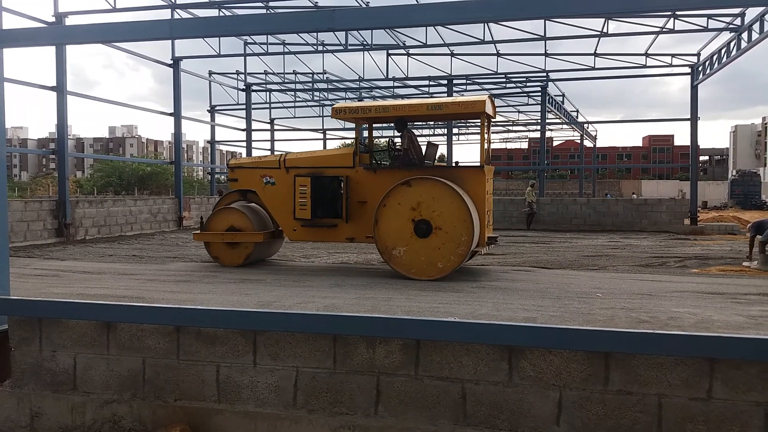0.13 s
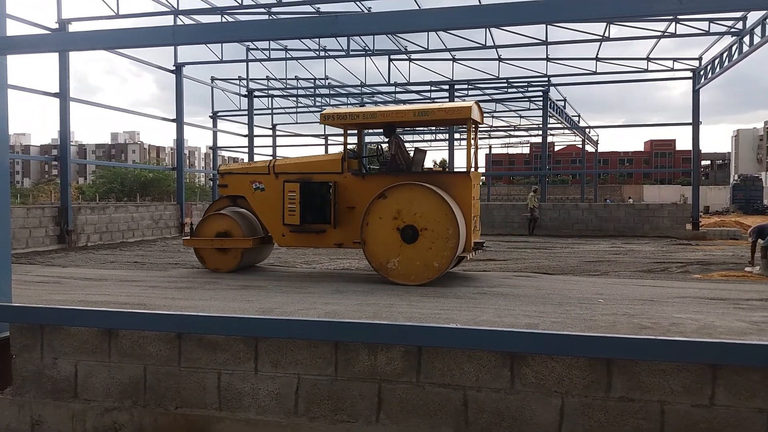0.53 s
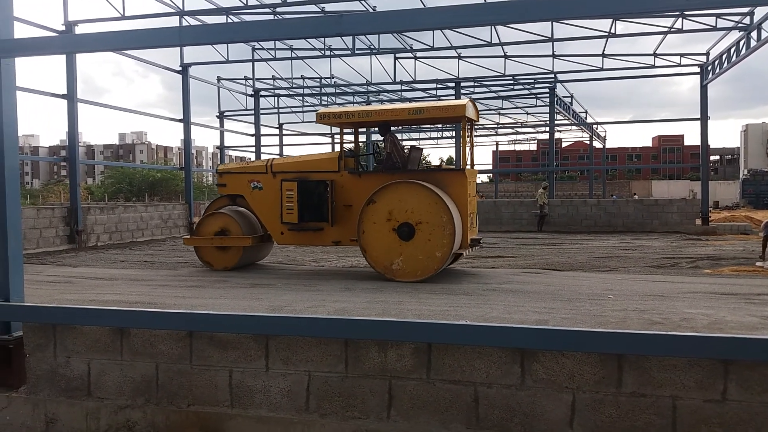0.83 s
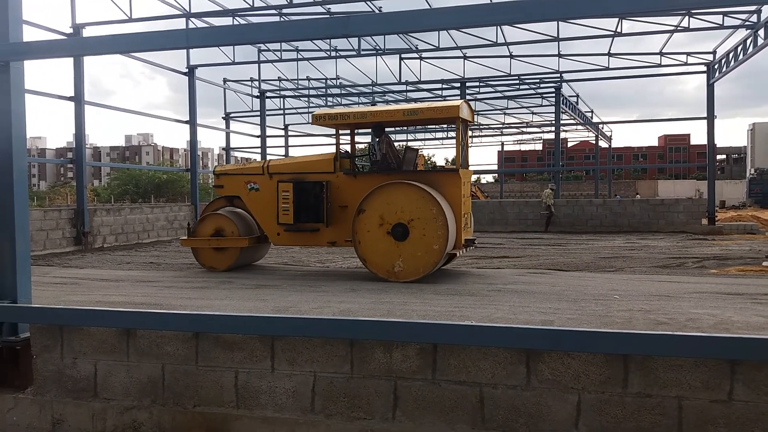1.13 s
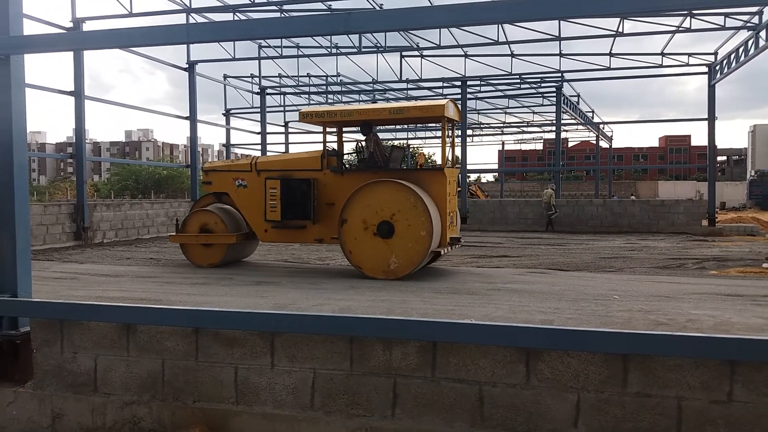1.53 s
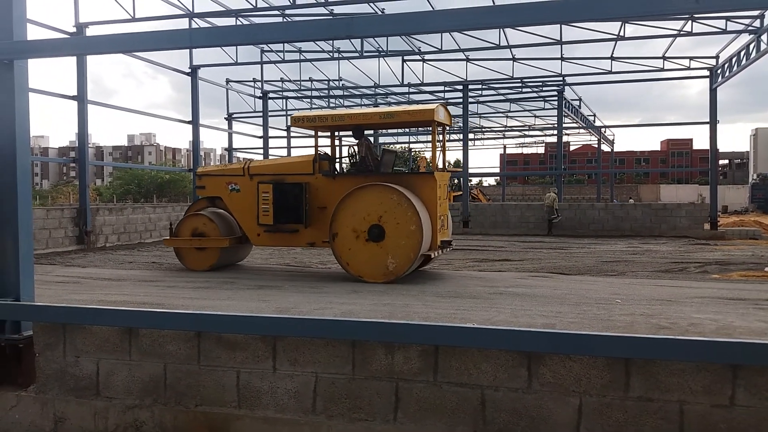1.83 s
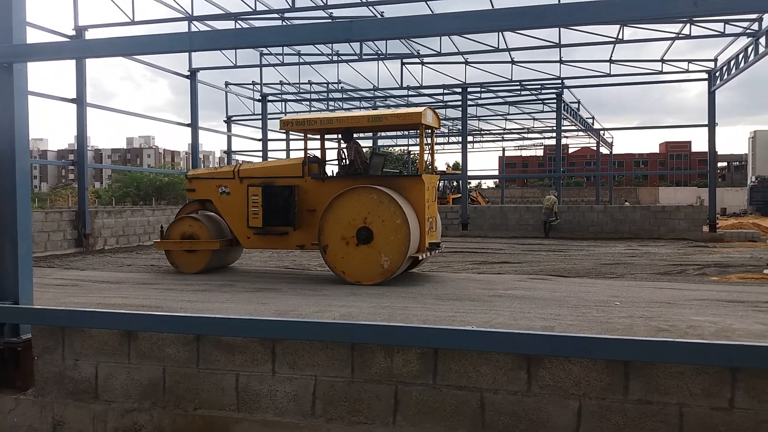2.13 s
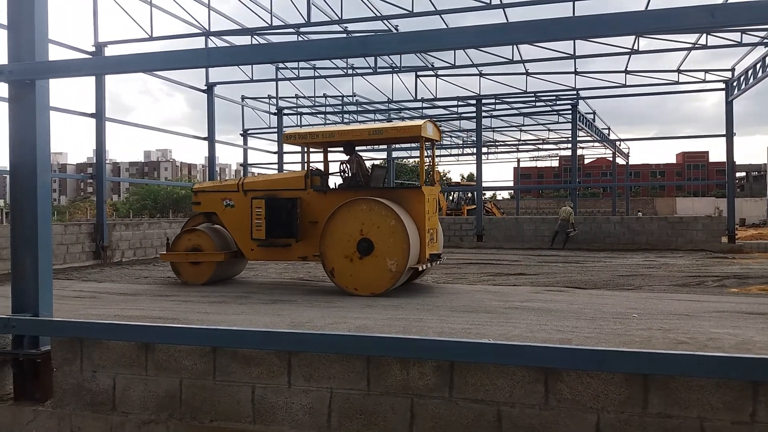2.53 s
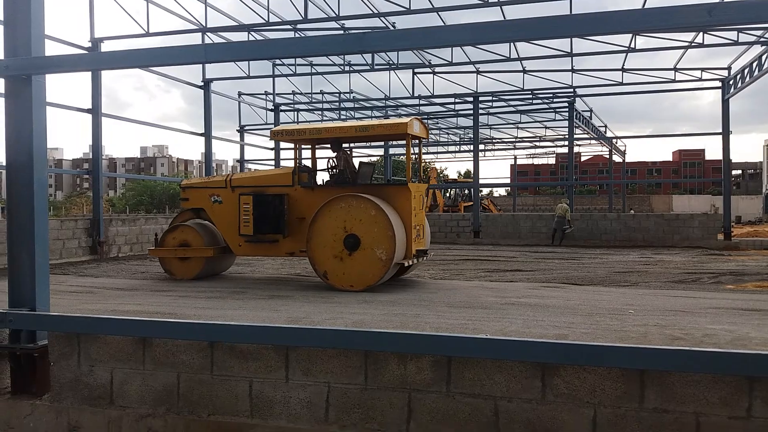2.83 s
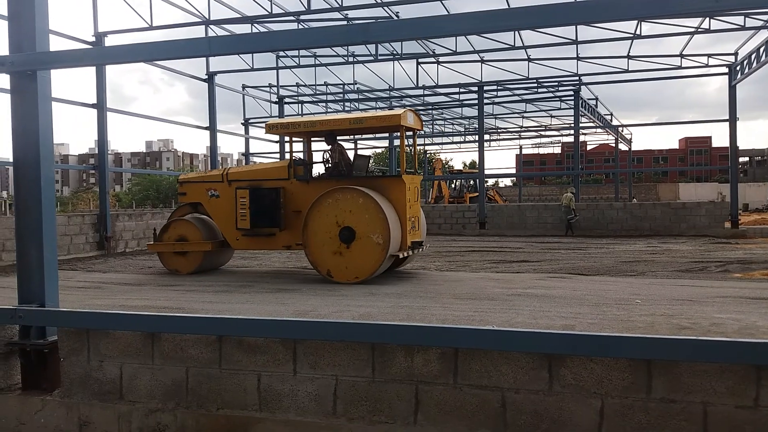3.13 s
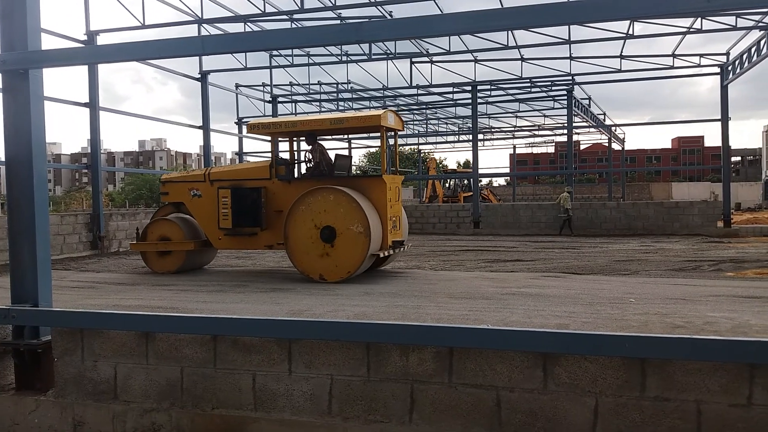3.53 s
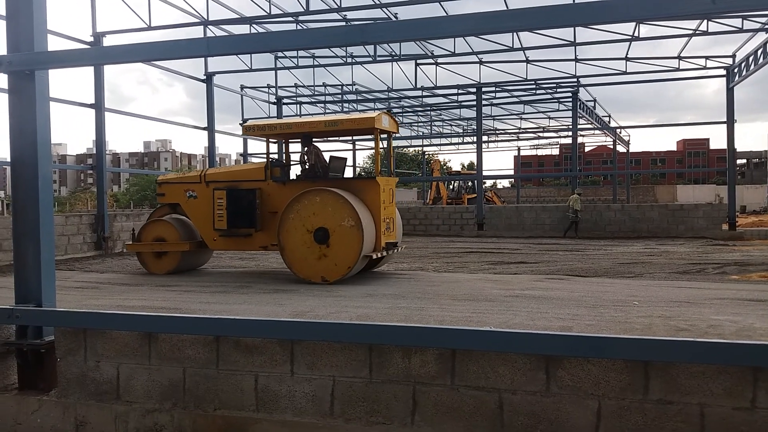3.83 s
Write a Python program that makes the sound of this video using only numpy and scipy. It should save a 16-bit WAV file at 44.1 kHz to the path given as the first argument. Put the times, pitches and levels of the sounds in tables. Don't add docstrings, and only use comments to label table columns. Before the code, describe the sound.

A diesel road roller chugs with fast hissing puffs and metallic knocking, drums rumbling on gravel.

```python
import sys
import numpy as np
from scipy import signal
from scipy.io import wavfile
from scipy.ndimage import uniform_filter1d

SR = 44100
rng = np.random.default_rng(int(sys.argv[2]) if len(sys.argv) > 2 else 0)


def to_wav(sig):
    pcm = np.clip(np.atleast_2d(sig), -1, 1) * 32767
    pcm = np.round(pcm).astype(np.int16)
    wavfile.write(sys.argv[1], SR, pcm.T)


def decibels_to_gain(level_db):
    exponent = np.asarray(level_db, float) / 20
    return 10 ** exponent


N = 175518
TIME = np.arange(N) / SR

# time_s, firings_per_s
ENGINE_SPEED = [(0, 34.229), (.7, 34.397), (1.5, 34.301), (1.9, 33.944), (2.15, 34.163), (2.5, 33.996),
                (3, 34.378), (3.98, 34.563)]
# time_s, presence_db, puff_db,
# facing # (0 side-on, 1 ahead)
ENGINE_VIEW = [(0, 3, 3.5, 0), (.09, 0.5, 3.5, 0.1), (.2, -3, -0.5, 0), (.6, -6.5, -4, .05),
               (1.1, -9, -7, 0.23), (1.35, -10, -7, 0.22), (1.62, -13, -6, 0.6), (1.75, -12.5, -12, 0.34),
               (2.2, -14.5, -12, 0.64), (2.55, -13, -17.5, 0.83), (2.75, -12.5, -12.5, 0.8),
               (3.4, -12.5, -12, 0.9), (3.98, -13, -15, 0.74)]
# freq_hz, level_db (per Hz)
GRAVEL_RUMBLE = [(25, -48), (42, -37), (55, -7.5), (76, -2.5), (110, 1), (170, -6.5), (300, -13),
                 (620, -33.5)]
# pitch_hz, width_hz, level_db
DRUM_SHELL = [
    (264.6, 31.7, -42.5),
    (301.2, 35.5, -39.5),
    (392.6, 16.3, -44.5),
]
# start_s, level_db, pitch_hz, decay_cycles
CRUSHED_STONES = [(0.172, -30, 158.3, 20), (0.264, -21.5, 101, 1), (0.602, -28.5, 165, 6),
                  (.76, -25, 150, 2), (.68, -33.5, 273, 12.5), (.77, -33, 304, 12.4),
                  (.95, -32.5, 103, 4.5), (1.001, -21, 130, 1.8), (1.35, -36.5, 302, 14.5),
                  (1.311, -29.5, 160, 4.7), (1.582, -26.5, 70.4, 1.8), (2.465, -26, 158, 2.1),
                  (2.524, -21, 109, 1.03), (2.7, -32, 164, 7.7), (3.071, -22, 81, 2.3),
                  (3.25, -30.5, 269, 3.5), (3.559, -52, 917, 35.5), (3.625, -21.5, 165, 1.8),
                  (3.81, -45, 896, 23)]
# time_s, second_order_db, fourth_order_db
EXHAUST_BOOM = [(0, -39.5, -59), (.35, -49, -61), (.62, -41, -37), (.87, -40, -47), (1.1, -35.5, -37.5),
                (1.4, -42.5, -44), (1.7, -40, -49.5), (2.1, -45.5, -52), (2.35, -40.5, -42.5),
                (2.7, -39.5, -49.5), (3.1, -38.5, -36.5), (3.3, -39, -37.5), (3.6, -60, -42),
                (3.98, -29.5, -38)]
# multiple_of_firing_rate, level_db
SHAFT_ORDERS = [(1.5, -54), (2.75, -47), (3, -54), (6, -56)]
# freq_hz, level_db (per Hz)
GEAR_CLATTER = [(470, -7.5), (575, -17), (700, -2.5), (900, -2), (1170, -10), (1500, -6), (2500, -17.5),
                (2750, -29)]
# pitch_hz, width_hz, level_db
BLOCK_MODES = [(1392, 32, 2), (1601, 66, -2), (1782, 57, -2.5), (2170, 340, -11)]
CYLINDER_SIDE_DB = [-3, -3.5, 5.5, 3]
CYLINDER_AHEAD_DB = [-8, 5, -1, -5]
# place_turns, level_db, decay_s, timing_spread_turns
FIRING_PUFFS = [
    (0, 0, .0022, .014),
    (.275, -3.5, .003, .03),
    (.08, -11.5, .0115, .02),
]
# freq_hz, level_db (per Hz)
SIDE_HISS = [(1900, -25), (2500, -4.5), (4300, -3), (5200, -6.5), (7000, -3), (9000, 0.5), (12500, -1.5),
             (16800, -4.5)]
# freq_hz, level_db (per Hz)
AHEAD_HISS = [(1900, -27), (2500, -12), (4300, -1), (5200, -7.5), (7000, -4), (9300, -3), (12500, -1.5),
              (16800, 5)]
# pitch_hz, width_hz, side_db, ahead_db
HISS_WHISTLES = [(2336, 310, -10, -20.5), (4710, 120, -24, -16), (7080, 190, -20.5, -38),
                 (8040, 890, -9.5, -6), (8444, 710, -13.5, -2.5), (11050, 600, -7.5, -9.5),
                 (14960, 900, -12, -7.5)]
# freq_hz, level_db (per Hz)
LEAK_HISS = [(2000, -19), (2800, -2.5), (4500, -3), (5300, -7), (8500, -5.5), (12500, -10), (16000, -10.5)]

FIRST_TURN, CYLINDERS = -.147, 4
BAND_EDGE_HZ = 15850


def evened(x):
    return x / np.sqrt(np.mean(x ** 2) + 1e-20)


def curve(rows, column):
    return np.interp(TIME, [r[0] for r in rows], [r[column] for r in rows])


def presence_db():
    return curve(ENGINE_VIEW, 1)


def facing_ahead():
    return np.clip(curve(ENGINE_VIEW, 3), 0, 1)


def resonate(x, hz, width_hz):
    turn = np.exp(2j * np.pi * hz * TIME)
    r = np.exp(-np.pi * width_hz / SR)
    return 2 * (turn * signal.lfilter([1 - r], [1, -r], x / turn)).real


def ring(x, hz, width_hz, wider):
    return evened(resonate(resonate(x, hz, wider * width_hz), hz, width_hz))


def noise(colour, patch_db, size, wide, slope_db=40):
    frames = 4 * N // size + 5
    hz = np.fft.rfftfreq(size, 1 / SR) + 1
    a, b, patches = rng.standard_normal((frames, len(hz), 3)).T
    patches = uniform_filter1d(patches, wide, 0)
    patches = evened(uniform_filter1d(patches, size=5, axis=1))
    f, level_db = np.transpose(colour)
    octaves_outside = np.maximum(np.log2(f[0] / hz), 0) + np.maximum(np.log2(hz / f[-1]), 0)
    shape_db = np.interp(np.log(hz), np.log(f), level_db) - slope_db * octaves_outside
    spectra = (a + 1j * b) * decibels_to_gain(shape_db[:, None] + patch_db * np.clip(patches, -2, 2))
    return evened(signal.istft(spectra, nperseg=size, noverlap=3 * size // 4)[1][:N])


def crank():
    return FIRST_TURN + np.cumsum(curve(ENGINE_SPEED, 1)) / SR


def train(place, spread, firing_db):
    count = len(firing_db)
    turns = np.arange(count) - 1 + place + spread * rng.standard_normal(count)
    clicks = np.zeros(N + 1)
    clicks[np.searchsorted(crank(), turns)] = decibels_to_gain(firing_db)
    clicks[0] = 0
    return clicks[:N]


def drums():
    RUMBLE_DB, RUMBLE_FOLLOW, RUMBLE_PATCH_DB = -33.5, 0.47, 1.9
    SHELL_FOLLOW = 0.79
    near_db = presence_db()
    rumble = noise(GRAVEL_RUMBLE, RUMBLE_PATCH_DB, size=2048, wide=5)
    out = decibels_to_gain(RUMBLE_DB + RUMBLE_FOLLOW * near_db) * rumble
    grit = rng.standard_normal(N)
    for hz, width_hz, db in DRUM_SHELL:
        out += decibels_to_gain(db + SHELL_FOLLOW * near_db) * ring(grit, hz, width_hz, wider=3)
    for start_s, db, hz, decay_cycles in CRUSHED_STONES:
        cycles = np.maximum(TIME - start_s, 0) * hz
        swell = np.minimum(2 * cycles, 1) * np.exp(-(cycles / decay_cycles) ** 2)
        out -= decibels_to_gain(db) * np.sin(2 * np.pi * cycles) * swell
    return out


def exhaust():
    WAVER = 0.42
    out = np.zeros(N)
    turns = crank()
    boom = [(2, curve(EXHAUST_BOOM, 1)), (4, curve(EXHAUST_BOOM, 2))]
    for multiple, db in boom + SHAFT_ORDERS:
        drifts = rng.standard_normal((2, N))
        a, b = (evened(uniform_filter1d(uniform_filter1d(v, size=3000), size=3000)) for v in drifts)
        tone = np.exp(2j * np.pi * (multiple * turns + rng.random()))
        tone = (1 + WAVER * (a + 1j * b)) * tone
        out += np.sqrt(2) * decibels_to_gain(db) * tone.real
    return out


def clatter():
    CLATTER_DB, CLATTER_FOLLOW = -38.5, 0.98
    contacts = noise(GEAR_CLATTER, 1.5, size=1024, wide=8)
    return decibels_to_gain(CLATTER_DB + CLATTER_FOLLOW * presence_db()) * contacts


def knock():
    KNOCK_DB, KNOCK_FOLLOW = -43.5, 0.88
    PLACE_TURNS, TIMING_SPREAD_TURNS, RATTLE_TURNS = .38, 0.0266, .28
    STRENGTH_SPREAD_DB, BLOW = 1.2, 24.
    count = int(crank()[-1]) + 2
    firing = np.arange(count) - 1
    facing = np.interp(firing, crank(), facing_ahead())
    side_db = np.array(CYLINDER_SIDE_DB)[firing % CYLINDERS]
    ahead_db = np.array(CYLINDER_AHEAD_DB)[firing % CYLINDERS]
    firing_db = side_db + (ahead_db - side_db) * facing
    firing_db = firing_db + STRENGTH_SPREAD_DB * rng.standard_normal(count)
    blows = train(PLACE_TURNS, TIMING_SPREAD_TURNS, firing_db)
    u = TIME[:SR // 20] * ENGINE_SPEED[0][1] / RATTLE_TURNS
    rattle = signal.oaconvolve(blows, np.exp(-u ** 2))[:N] * rng.standard_normal(N)
    drive = rattle + BLOW * blows * rng.choice([-1, 1], N)
    rings = sum(decibels_to_gain(db) * ring(drive, hz, width_hz, wider=5) for hz, width_hz, db in BLOCK_MODES)
    return decibels_to_gain(KNOCK_DB + KNOCK_FOLLOW * presence_db()) * evened(rings)


def puff_power():
    PUFF_SPREAD_DB, SHARED_SPREAD_DB, RISE_S = 1.8, .3, .0002
    power = np.zeros(N)
    t = TIME[:SR // 10]
    chance = rng.standard_normal((int(crank()[-1]) + 2, 4))
    for k, (place, db, decay_s, spread) in enumerate(FIRING_PUFFS):
        shape = np.exp(-2 * t / decay_s) * np.minimum(t / RISE_S, 1) ** 2
        firing_db = db + PUFF_SPREAD_DB * chance[:, k] + SHARED_SPREAD_DB * chance[:, -1]
        power += signal.oaconvolve(train(place, spread, firing_db) ** 2, shape)[:N]
    return power


def puffs():
    HISS_DB, PATCH_DB = -42.5, 2.1
    LEAK_DB, LEAK_FOLLOW = -51.5, 1
    facing = facing_ahead()
    power = puff_power()
    side = noise(SIDE_HISS, PATCH_DB, size=512, wide=12)
    ahead = noise(AHEAD_HISS, PATCH_DB, size=512, wide=12)
    flat = [(HISS_WHISTLES[0][0] / 2, 0), (BAND_EDGE_HZ, 0)]
    white = noise(flat, PATCH_DB, size=512, wide=12)
    hiss = np.sqrt(1 - facing) * side + np.sqrt(facing) * ahead
    for hz, width_hz, side_db, ahead_db in HISS_WHISTLES:
        hiss += decibels_to_gain(side_db + (ahead_db - side_db) * facing) * ring(white, hz, width_hz, wider=1)
    leak = decibels_to_gain(LEAK_DB + LEAK_FOLLOW * presence_db()) * noise(LEAK_HISS, 1.5, size=512, wide=12)
    bursts = evened(hiss) * evened(np.sqrt(abs(power)))
    return decibels_to_gain(HISS_DB + curve(ENGINE_VIEW, 2)) * bursts + leak


def scene():
    return (drums() + exhaust() + clatter() + knock() + puffs())[None]


def low_pass(x, edge_hz):
    return signal.oaconvolve(x, signal.firwin(511, edge_hz, window=("kaiser", 9), fs=SR), "same")


def slip(x):
    SLIP_AT_S, SLIP_S, FADE_S = 2.0235, .0078, .002
    BUMP_DB, BUMP_S = -38, 0.011
    after = np.clip((TIME - SLIP_AT_S) / FADE_S + 1, 0, 1)
    late = np.roll(x, round(SLIP_S * SR))
    x = x * np.maximum(1 - 2 * after, 0) + late * np.maximum(2 * after - 1, 0)
    return x - decibels_to_gain(BUMP_DB) * np.exp(-((TIME - SLIP_AT_S) / BUMP_S) ** 2)


def band_limit(x):
    SPILL_OVER_DB, SPILL_DB = 10.6, -8
    low = low_pass(x, BAND_EDGE_HZ)
    top = x - low
    power = uniform_filter1d(top ** 2, size=100)
    sharp = power > decibels_to_gain(2 * SPILL_OVER_DB) * uniform_filter1d(power, size=SR // 4)
    held = np.minimum(uniform_filter1d(1. * sharp, size=300) * 300, 1)
    spill = uniform_filter1d(held, size=100)
    return low + decibels_to_gain(SPILL_DB) * spill * top


def top_cut(x):
    return signal.sosfilt(signal.butter(12, 16820, fs=SR, output="sos"), x)


def record(dry):
    NOTCH_HZ, NOTCH_WIDTH_HZ, NOTCH_DEPTH = 5254, 420, 0.64
    LOW_CUT_HZ, SPILL_EDGE_HZ = 50, 16800
    x = dry[0] - NOTCH_DEPTH * resonate(dry[0], NOTCH_HZ, NOTCH_WIDTH_HZ)
    x = signal.sosfilt(signal.butter(2, LOW_CUT_HZ, "high", fs=SR, output="sos"), x)
    x = slip(low_pass(x, SPILL_EDGE_HZ))
    mix = band_limit(x)[None]
    return top_cut(mix)


dry = scene()
out = record(dry)
to_wav(out)
```